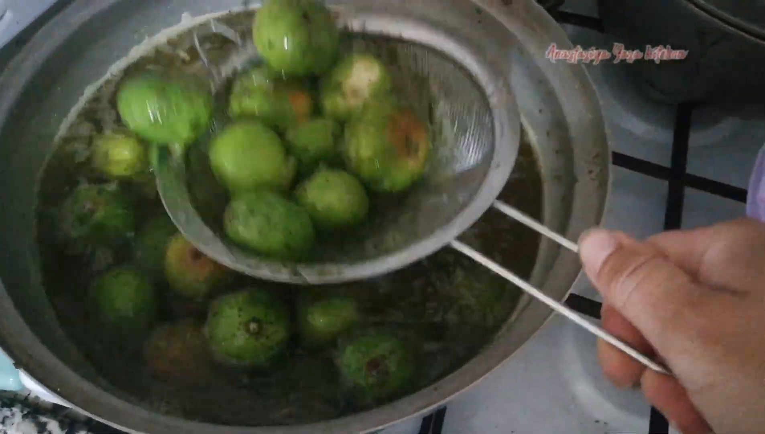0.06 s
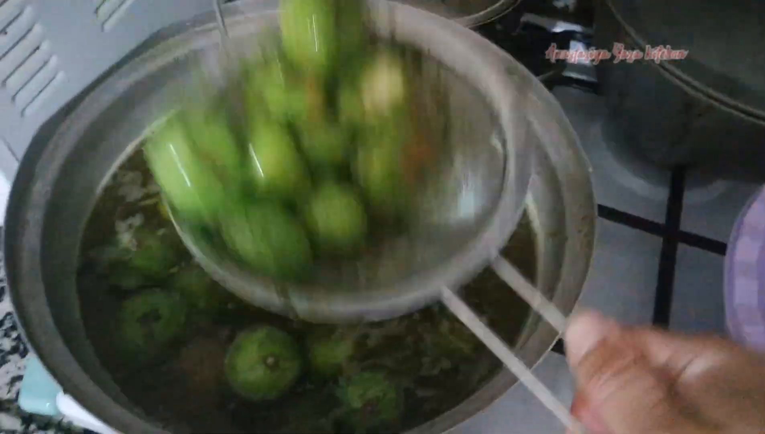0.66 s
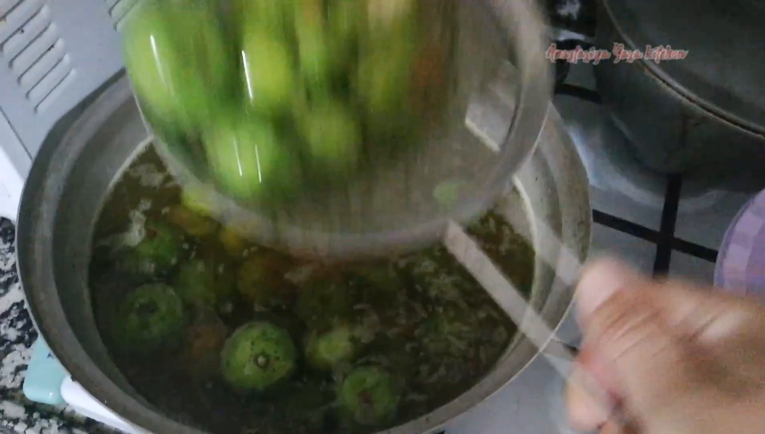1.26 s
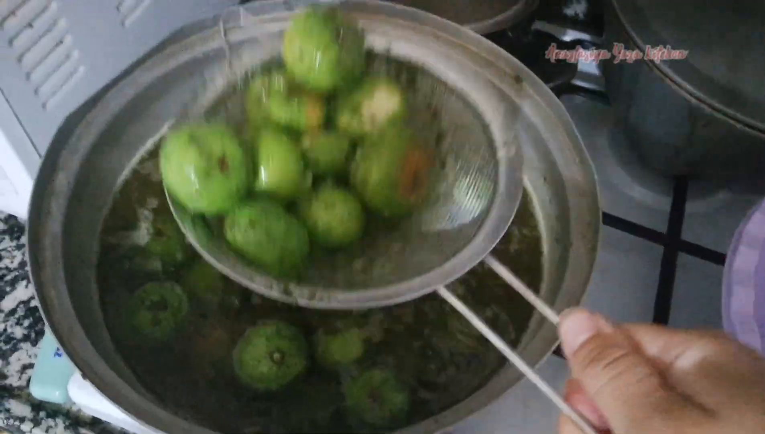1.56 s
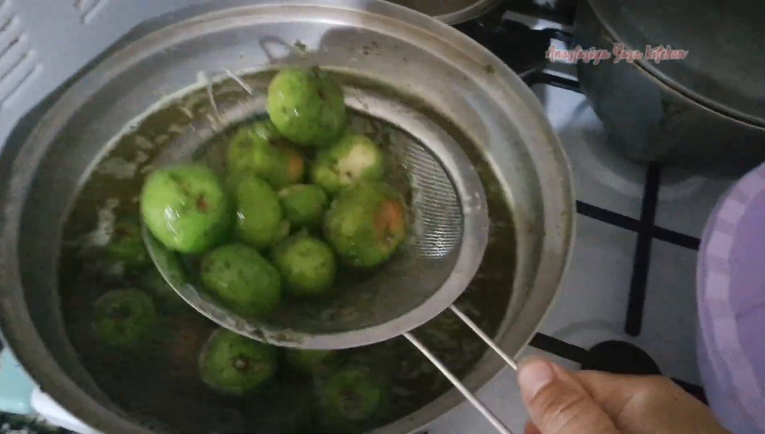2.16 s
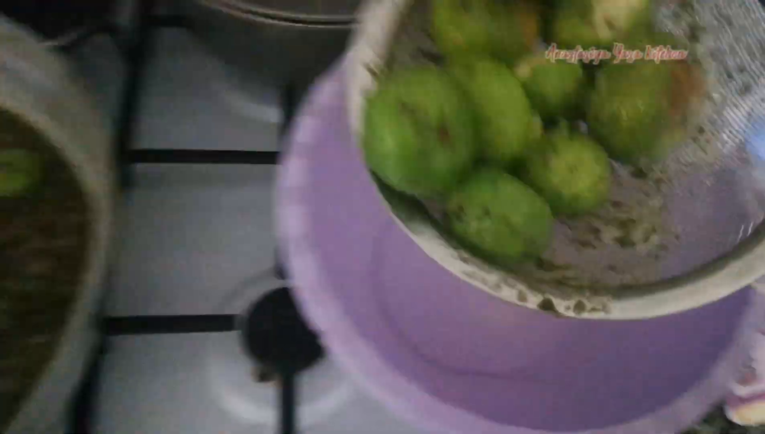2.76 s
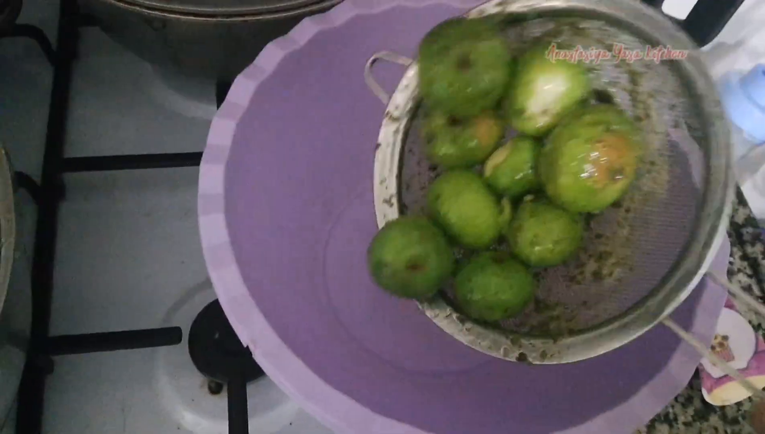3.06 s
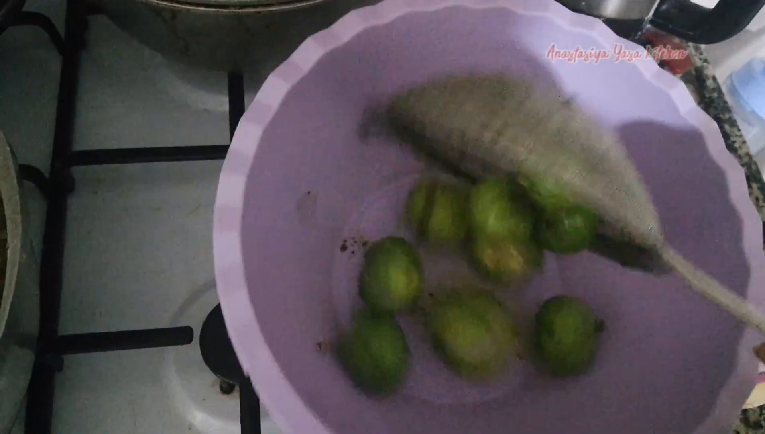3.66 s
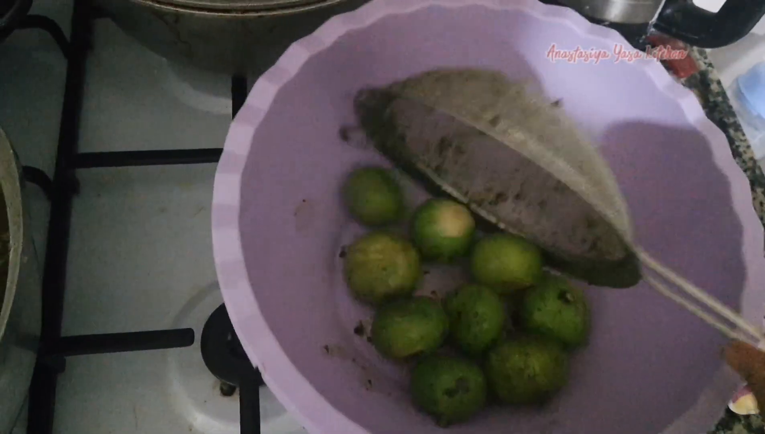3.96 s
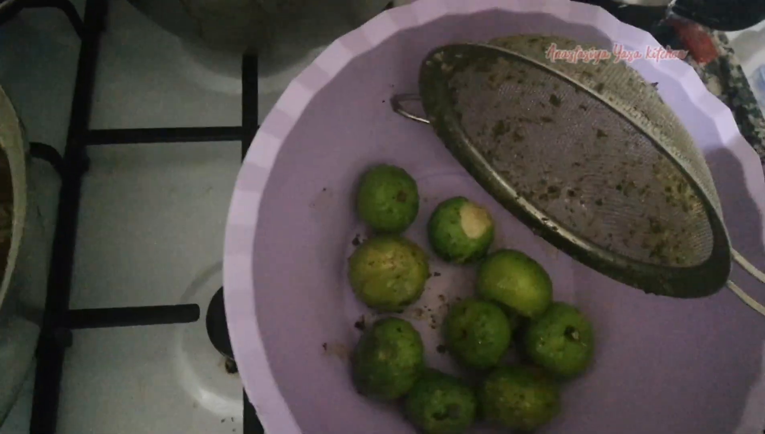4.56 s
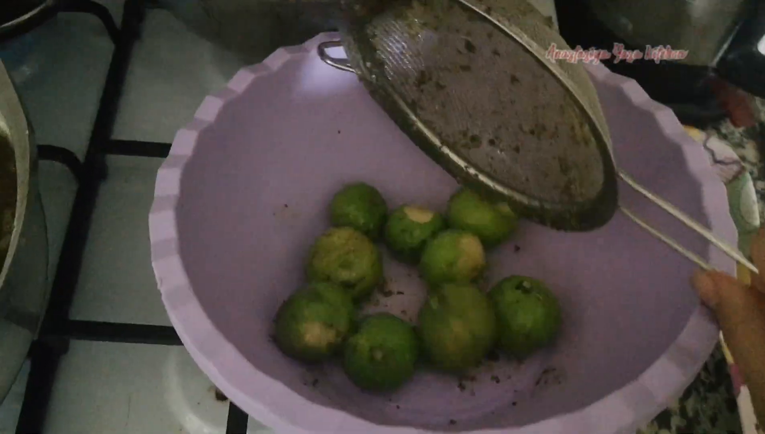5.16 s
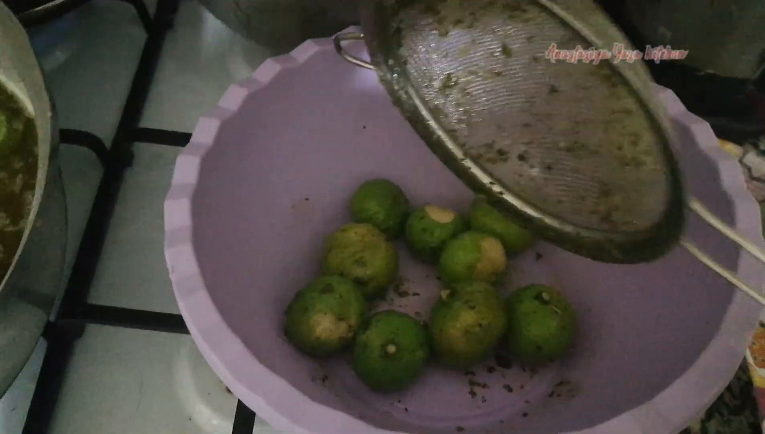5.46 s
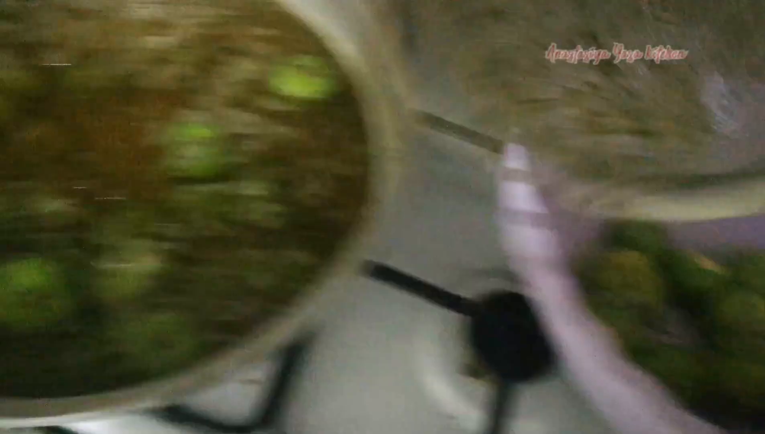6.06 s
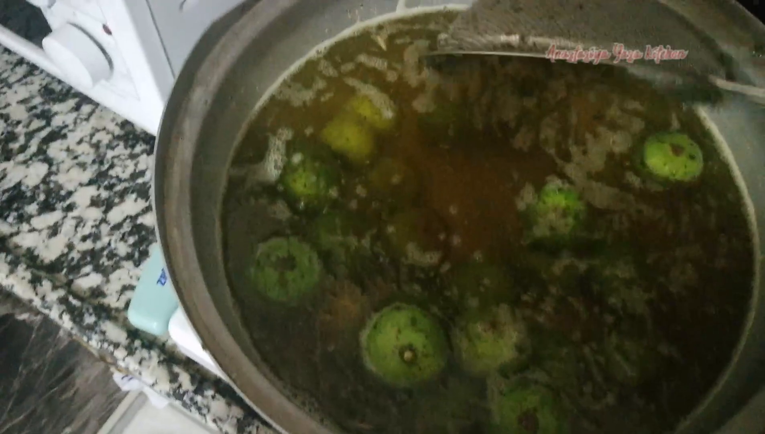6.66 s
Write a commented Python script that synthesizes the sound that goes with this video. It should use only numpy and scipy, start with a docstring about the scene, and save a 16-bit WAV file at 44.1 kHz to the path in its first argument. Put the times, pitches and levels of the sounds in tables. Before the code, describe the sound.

A gas flame hisses softly in a small kitchen while drops plink from a wire skimmer into a pot. Wet figs then tumble into a plastic bowl with hollow thumps, slaps and rolling, and the bowl chatters on the hob grate. After a lull it gives a sharp knock. Finally the skimmer clinks on the pot and plunges in, rasping and sloshing. Everything sounds close.

```python
"""A gas flame hisses in a small kitchen while boiled figs drip from a wire skimmer back into the pot.
Near 3 s they tumble into a plastic bowl on the hob: each thumps the thin floor, slaps wetly and rolls,
droplets spatter, and the bowl rocks and chatters on the iron grate. At 4.7 s it drops back with a
sharp knock. From 6.4 s the skimmer clinks on the pot and plunges in again, rasping and sloshing."""
import sys
import numpy as np
from scipy import signal
from scipy.fft import rfft, irfft, next_fast_len
from scipy.io import wavfile

SR = 44100
rng = np.random.default_rng(int(sys.argv[2]) if len(sys.argv) > 2 else 0)


def materialize(psi):
    """Save the field psi as 16-bit PCM at rate SR to the path in sys.argv[1].

    A 1-D psi becomes a single channel; in a 2-D psi each row is a channel.
    """
    bounded = np.clip(np.atleast_2d(psi).T, -1, 1)
    quanta = np.round(bounded * 32767).astype(np.int16)
    wavfile.write(sys.argv[1], SR, quanta)


N = 299791
TIME = np.arange(N) / SR
AGE = np.arange(SR // 2) / SR   # seconds since a hit

# stereo image of the noises, mono in the bass and wide on top: f/Hz, left-right correlation
STEREO_LIKENESS = [(60, 1), (150, 0.97), (290, 0.86), (640, 0), (1400, 0.37), (3000, 0.023), (15000, 0)]
# low room tone: f/Hz, density/dB
ROOM_SPECTRUM = [(20, 0), (35, -6), (48, 6.5), (70, -7), (100, -13), (120, -12.5), (145, -2.5),
                 (185, -10.5), (235, -6.5), (330, -15.5), (500, -21.5)]
# mains hum: f/Hz, level/dB
HUM_PARTIALS = [(49.5, -65), (100, -67.5), (300, -71)]
# kitchen reverb: band centre f/Hz, level/dB, t60/s
KITCHEN_BANDS = [(120, 4.5, 0.32), (254, 3.5, 0.099), (520, -2, 0.29), (950, -6, 0.5), (2120, -1.5, 0.15),
                 (4500, -3, 0.27), (7900, -3.5, 0.073)]
# level of the gas flame as the listener moves: t/s, level/dB
FLAME_LEVEL = [(0, -56.5), (1.6, -57), (2.4, -58.5), (4.4, -57), (5.8, -56), (6.8, -53.5)]
# hiss of the flame: f/Hz, density/dB
HISS_SPECTRUM = [(200, -13), (350, 2.5), (520, 0), (800, 1.5), (1300, 4.5), (2300, 1), (3500, 0.5),
                 (5000, -1), (7500, 2.5), (10000, -2.5), (12000, -8), (15500, -13)]
# hollow around the pot, rung by the flame: f/Hz, width/Hz, level/dB
POT_CAVITY = [(1030, 53, 0.5), (1447, 100, 1.5), (1520, 55, -14), (2876, 59, -4.5), (4330, 250, -11)]
# hollow around the bowl, rung by the flame: f/Hz, width/Hz, level/dB
BOWL_CAVITY = [(622, 27, -7.5), (1176, 46, 1.5), (1330, 46, 3.5), (1530, 84, -3.5), (2780, 150, -11)]

# drops falling into the pot: t/s, tick/dB, bubble/dB, bubble f/Hz, bubble t60/cycles
DROPS = [(.038, -55, -37.5, 6300, 66), (.189, -56.5, -53, 8100, 60), (.38, -56, -49, 9700, 20),
         (.424, -46, -34.5, 1696, 70), (.551, -55.5, -48.5, 4190, 360), (0.558, -55, -44, 1630, 30),
         (.582, -58, -50, 2590, 70), (.628, -70, -53, 3600, 180), (.691, -62, -36, 9000, 70),
         (.723, -54, -51, 2100, 61), (.725, -63, -49.5, 1110, 45), (.767, -55, -38, 12200, 50),
         (0.829, -52, -56, 2420, 54), (0.8832, -51, -29.5, 9780, 136), (1.237, -58, -49.5, 2800, 120),
         (2.783, -55, -59, 1630, 20), (2.981, -54, -55, 12200, 60), (6.121, -54, -42, 9360, 90)]
# showers of fine droplets from the mesh: t/s, attack/s, hold/s, t60/s, level/dB
SHOWERS = [(3.389, .004, .004, 0.088, -45), (3.43, 0.0027, 0.0091, 0.2, -37),
           (3.475, 0.16, .008, 0.66, -55), (6.52, 0.068, 0.019, .05, -38.5), (6.626, 0.063, 0.044, .2, -49)]
# sizzle of those droplets: f/Hz, density/dB
SPATTER_SPECTRUM = [(3500, -9), (6500, 4.5), (9000, 6), (12000, -5), (15500, -5)]

# the skimmer jerking down the pot wall: t/s, attack/s, scrape/dB, slosh/dB
PLUNGE_STROKES = [(6.36, 0.024, -45, -48), (6.398, 0.017, -38.5, -67), (6.45, 0.057, -33.5, -50.5),
                  (6.56, 0.031, -36, -42.5), (6.61, 0.047, -43.5, -47), (6.689, 0.058, -36, -51.5)]
# wire scraping the pot: f/Hz, density/dB
SCRAPE_SPECTRUM = [(240, -41), (400, -10), (473, -7.5), (543, -17), (605, -6.5), (761, -4), (1100, -1),
                   (1400, -2), (1950, -7), (2840, -2), (4030, -8), (4840, -7), (5910, -6.5), (8030, -12),
                   (15500, -30)]
# water shoved aside: f/Hz, density/dB
SLOSH_SPECTRUM = [(70, -29), (120, -7.5), (165, 1.5), (240, -1.5), (320, -8.5), (500, -14.5), (900, -39)]
# the skimmer striking the pot: t/s, ring/dB, crack/dB
RIM_HITS = [(6.3613, -29.5, -33.5), (6.3777, -45, -44), (6.612, -33, -24.5), (6.619, -46, -31),
            (6.779, -44, -38.5)]
# ring of the skimmer's rim: f/Hz, level/dB, t60/s
RIM_MODES = [(880, -10, 0.2), (1380, -23, 0.031), (1572, -2.5, 0.1), (2293, 3.5, 0.063), (2350, -4, 0.18),
             (2870, -8, 0.13), (3380, -3, 0.086), (6130, 1, 0.024), (7600, 14, 0.014), (8270, 11, 0.011),
             (9130, -3, 0.066)]

# figs rolling over the bowl floor: t/s, attack/s, hold/s, t60/s, rumble/dB, wet rub/dB
FIG_ROLLS = [(3.06, 0.046, 0.012, 0.45, -32.5, -34.5), (3.419, 0.019, 0.017, 0.36, -31.5, -34.5),
             (3.5, 0.19, 0.038, 0.42, -40.5, -44), (3.98, 0.083, .01, 0.48, -73, -55.5),
             (4.13, .16, .03, .2, -58.5, -48.5), (4.62, 0.036, 0.012, 0.17, -54.5, -46),
             (4.71, 0.034, 0.16, 0.23, -41, -40)]
# low drumming of rolling fruit: f/Hz, density/dB
RUMBLE_SPECTRUM = [(35, -43.5), (60, -37), (86, 1), (128, -2.5), (161, 4), (206, -0.5), (302, 1),
                   (398, -9.5), (466, -7), (900, -15), (1170, -50), (1980, -120)]
# wet skin rubbing on plastic: f/Hz, density/dB
RUB_SPECTRUM = [(470, -37), (800, -15), (1240, -28), (1340, -1.5), (2300, -3.5), (2500, -6.5), (3710, -14),
                (10000, -20), (15000, -54)]
# the bowl singing under rolling fruit: f/Hz, width/Hz, level/dB
ROLL_RESONANCES = [(318, 50, -0.5), (473, 27, 4.5), (1090, 260, -4), (1880, 43, -5), (2480, 130, -9)]

# ring of the bowl's walls: f/Hz, level/dB, t60/s
WALL_MODES = [(247, 3.5, 0.12), (291, -1.5, 0.13), (361, -4.5, 0.065), (473, -1, 0.17), (607.4, 6, 0.12),
              (657, 7, 0.041), (764, 0, 0.051), (855, -7.5, 0.13), (1058, 3.5, 0.083), (1188, 4, 0.095),
              (1540, 2.5, 0.079)]
# dull pat of a fig's flesh: f/Hz, density/dB
PAT_SPECTRUM = [(280, -6), (600, 13), (1300, -1.5), (2200, -13)]
# wet skin smacking plastic: f/Hz, density/dB
SLAP_SPECTRUM = [(600, -56), (1500, 1.5), (2200, 6), (3200, 2), (4200, 0.5), (6000, -6.5), (9500, -9.5),
                 (12000, -19), (16000, -41)]
# tight, damped clack of the bowl's foot on the grate: f/Hz, level/dB, t60/s
FOOT_MODES = [(1178, -5, 0.022), (1587, 3.5, 0.007), (1907, -4.5, 0.015), (2180, -30, 0.019),
              (3950, -21, 0.023)]
# the foot chattering: t/s, first clack/dB, first wall ring/dB, gap between touches/s, loss per touch/dB
FOOT_KNOCKS = [(3.0704, -16.5, -30.5, 0.021, 14), (3.125, -28.5, -38, 0.024, 4.5),
               (3.4369, -27, -40, 0.012, 5), (3.6015, -41, -47, 0.012, 0), (4.6836, -35.5, -44, .012, 21),
               (4.712, -16.5, -42, 0.014, 12)]
# figs landing in the bowl: t/s, thump f/Hz, thump/dB, wall ring/dB, wet slap/dB
FIG_LANDINGS = [(2.932, 302, -65, -53, -57.5), (3.004, 170, -27.5, -38, -43),
                (3.0215, 157, -24.5, -40, -61), (3.062, 150, -24.5, -37.5, -35.5),
                (3.092, 171, -25, -28.5, -34), (3.125, 154, -29, -28.5, -32.5),
                (3.3409, 162.5, -28.5, -49.5, -32.5), (3.374, 151, -35, -55, -50),
                (3.397, 140, -55, -50, -44), (3.428, 213, -26.5, -44, -60), (3.434, 221, -21.5, -31, -43),
                (3.4365, 218, -25, -26.5, -21.5), (3.4494, 222, -22.5, -28.5, -36),
                (3.543, 138, -32, -47, -31.5), (3.6019, 157, -28.5, -33.5, -50),
                (3.616, 141, -30.5, -35.5, -40.5), (3.627, 149, -26.5, -59, -40),
                (3.703, 150, -37.5, -52, -50), (3.7204, 290, -27.5, -40.5, -54.5),
                (3.735, 261, -33.5, -39.5, -47), (3.79, 266, -40, -55, -62), (3.806, 262, -40.5, -57, -52),
                (4.6829, 294, -47, -35.5, -34), (4.7135, 187, -26.5, -45, -53),
                (4.7245, 180, -28.5, -32.5, -33.5)]


def from_db(db):
    """Decibels to gain."""
    return 10 ** (np.asarray(db) / 20)


def rms_one(x):
    """Scale to unit rms."""
    return x / np.sqrt(np.mean(x ** 2) + 1e-20)


def unit_hit(x):
    """Scale a hit to unit rms over its first 10 ms."""
    return x / np.sqrt(np.mean(x[..., :SR // 100] ** 2) + 1e-20)


def pan(db):
    """Stereo gains with the left louder than the right by 'db'."""
    return from_db(np.array([[db], [-db]]) / 2)


def add(out, start_s, sound):
    """Drop a sound onto the timeline."""
    at = round(start_s * SR)
    out[:, at:at + sound.shape[-1]] += sound[..., :N - at]


def decay(t60):
    """The envelope of a hit, down 60 dB after t60 seconds."""
    return from_db(-60 * AGE / t60)


def swell(start_s, attack_s, hold_s, t60):
    """An envelope that ramps up, holds and dies away."""
    age = TIME - start_s
    release = from_db(-60 * np.maximum(age - attack_s - hold_s, 0) / t60)
    return np.clip(age / attack_s, 0, 1) * release


def colour(white, spectrum):
    """EQ two unrelated noises and pull their bass to the centre; rms 1."""
    length = white.shape[-1]
    size = next_fast_len(length)
    log_hz = np.log(np.arange(size // 2 + 1) * SR / size + 1e-9)
    hz, db = np.transpose(spectrum)
    past_edge = np.abs(log_hz - np.clip(log_hz, np.log(hz[0]), np.log(hz[-1])))
    gain = from_db(np.interp(log_hz, np.log(hz), db) - 50 * past_edge)
    like_hz, likeness = np.transpose(STEREO_LIKENESS)
    alike = np.clip(np.interp(log_hz, np.log(like_hz), likeness), -1, 1)
    mid, side = rfft(white, size) * gain
    stereo = np.sqrt(1 + alike) * mid + np.sqrt(1 - alike) * side * [[1], [-1]]
    return rms_one(irfft(stereo, size)[:, :length])


def noise(spectrum, size=N):
    """Smooth stereo noise of a given spectrum."""
    return colour(rng.standard_normal((2, size)), spectrum)


def grains(per_s, spread_db):
    """Two streams of random clicks of uneven size."""
    sizes = from_db(spread_db * np.minimum(rng.exponential(1, (2, N)), 4))
    signs = rng.choice([-1, 1], (2, N))
    fires = rng.random((2, N)) < per_s / SR
    return rms_one(sizes * signs * fires)


def drift(rate_hz):
    """A slow random wander on the order of 1."""
    knots = rng.standard_normal(1000)
    return np.interp(TIME * rate_hz, np.arange(len(knots)), knots)


def flutter(x, depth_db, rate_hz, bands):
    """Split a sound into bands that each swell and sink on their own; rms 1."""
    size = next_fast_len(N)
    spectrum = rfft(x, size)
    log_hz = np.log(np.arange(size // 2 + 1) * SR / size + 1)
    place = np.interp(log_hz, np.log([600, 12000]), [0, bands - 1])
    windows = (np.maximum(1 - np.abs(place - k), 0) for k in range(bands))
    slices = (irfft(spectrum * window, size)[:, :N] for window in windows)
    return rms_one(sum(band * from_db(depth_db * drift(rate_hz)) for band in slices))


def resonate(x, resonances):
    """Play a sound through parallel resonators; rms 1."""
    return rms_one(sum(from_db(db) * signal.lfilter(*signal.iirpeak(hz, hz / width, fs=SR), x)
                       for hz, width, db in resonances))


def ring(hz, t60, rise=0):
    """A dying sine; its pitch bends up by the fraction 'rise' as it dies."""
    bend = 1 + rise * np.minimum(AGE / t60, 1) / 2
    return np.sin(2 * np.pi * hz * AGE * bend) * decay(t60)


def strike(modes, scatter_db, lag_s, detune=0):
    """Ring all modes with a fresh balance and optional detune; the right channel lags a touch."""
    strength, shift = rng.standard_normal((2, len(modes)))
    left = sum((-1) ** k * from_db(db + scatter_db * strength[k]) * ring(hz * (1 + detune * shift[k]), t60)
               for k, (hz, db, t60) in enumerate(modes))
    right = np.interp(AGE - lag_s, AGE, left, left=0)
    return unit_hit(np.array([left, right]))


def burst(spectrum, t60, tail_db, tail_t60):
    """A crack of noise with a softer, longer tail that swells in behind it."""
    crack = decay(t60)
    tail = from_db(tail_db) * decay(tail_t60) * (1 - crack)
    return unit_hit(noise(spectrum, size=len(AGE)) * (crack + tail))


def room_tone():
    """The bed: low room noise and mains hum."""
    hum = sum(from_db(db) * np.sqrt(2) * np.sin(2 * np.pi * (hz * TIME + rng.random()))
              for hz, db in HUM_PARTIALS)
    return from_db(-60) * noise(ROOM_SPECTRUM) + hum


def gas_flame(to_bowl_s=2.19, back_at_pot_s=6.14, swing_s=0.34):
    """The flame flutters and rings the nearer vessel's hollow as the listener swings to the bowl and back."""
    level_db = np.interp(TIME, *np.transpose(FLAME_LEVEL))
    at_bowl = np.clip(np.minimum(TIME - to_bowl_s, back_at_pot_s - TIME) / swing_s, 0, 1)
    roar = rng.standard_normal((2, N))
    hollow = np.sqrt(1 - at_bowl) * resonate(roar, POT_CAVITY)
    hollow += np.sqrt(at_bowl) * resonate(roar, BOWL_CAVITY)
    hiss = from_db(-0.3) * noise(HISS_SPECTRUM) * pan(db=2.5) + from_db(-5) * hollow * pan(db=0.5)
    return from_db(level_db) * flutter(hiss, depth_db=1.75, rate_hz=12, bands=10) * pan(db=1.5)


def kitchen_reverb(send, build_s):
    """Dense reflections off tiles and hob build fast and die away band by band."""
    response = 0
    for hz, db, t60 in KITCHEN_BANDS:
        octave = noise([(hz / np.sqrt(2), 0), (hz * np.sqrt(2), 0)], size=len(AGE))
        tail = octave * decay(t60) * (1 - np.exp(-(AGE / build_s) ** 2))
        unity_gain = np.sqrt(np.sqrt(2) * hz / SR / len(AGE))
        response += from_db(db) * rms_one(tail) * unity_gain
    return signal.fftconvolve(send, response, axes=1)[:, :N]


def drips():
    """A drop ticks on the water, brighter the smaller it is, and traps a bubble that chirps upward."""
    out = np.zeros((2, N))
    for start_s, tick_db, bubble_db, hz, cycles in DROPS:
        tick_spectrum = [(0.6 * hz, -16), (1.05 * hz, 0), (1.5 * hz, -8), (7 * hz, -22)]
        tick = burst(tick_spectrum, t60=0.006, tail_db=-11, tail_t60=0.05) * pan(db=9.5)
        # the bubble is cut off below half its pitch
        low_cut = signal.butter(2, hz / 2, "high", fs=SR, output="sos")
        bubble = signal.sosfilt(low_cut, ring(hz, t60=cycles / hz, rise=0.093)) * pan(db=8)
        add(out, start_s, from_db(tick_db) * tick + from_db(bubble_db) * bubble)
    return out


def spatter():
    """Tiny droplets crackle as they shower into the bowl and as the mesh goes under."""
    envelope = sum(from_db(db) * swell(*timing) for *timing, db in SHOWERS)
    return envelope * colour(grains(per_s=1600, spread_db=2), SPATTER_SPECTRUM) * pan(db=5)


def skimmer_plunge():
    """The mesh rasps down the pot wall in shifting colours, rings the rim and shoves water aside."""
    slips = grains(per_s=6000, spread_db=1)
    rim = strike(RIM_MODES, scatter_db=1, lag_s=0.0001)
    ringing = rms_one(signal.fftconvolve(slips, rim, axes=1)[:, :N])
    # the tone moves with the point of contact
    mesh = flutter(colour(slips, SCRAPE_SPECTRUM), depth_db=4, rate_hz=24, bands=30)
    rasp = (mesh + from_db(-11.5) * ringing) * pan(db=5)
    slosh = colour(grains(per_s=840, spread_db=1.8), SLOSH_SPECTRUM)
    out = np.zeros((2, N))
    for start_s, attack_s, scrape_db, slosh_db in PLUNGE_STROKES:
        envelope = swell(start_s, attack_s, hold_s=0.01, t60=0.41)
        out += envelope * (from_db(scrape_db) * rasp + from_db(slosh_db) * slosh)
    return out


def skimmer_clinks():
    """The wire rim cracks against the pot and rings briefly, damped by hand and water."""
    out = np.zeros((2, N))
    for start_s, ring_db, crack_db in RIM_HITS:
        crack = burst(SCRAPE_SPECTRUM, t60=0.012, tail_db=-15, tail_t60=0.07)
        rim = strike(RIM_MODES, scatter_db=2, lag_s=0.0001)
        add(out, start_s, from_db(crack_db) * crack + from_db(ring_db) * rim)
    return out * pan(db=6.5)


def rolling_figs():
    """Lumpy fruit drums on the bowl floor while its wet skin sticks and peels, making the walls sing."""
    drumming = colour(grains(per_s=900, spread_db=0.5), RUMBLE_SPECTRUM)
    peeling = grains(per_s=2500, spread_db=2.5)
    skin = from_db(-5.5) * colour(peeling, RUB_SPECTRUM)
    singing = from_db(-7) * resonate(peeling, ROLL_RESONANCES)
    rub = (skin + singing) * pan(db=3)
    return sum(swell(*timing) * (from_db(rumble_db) * drumming + from_db(rub_db) * rub)
               for *timing, rumble_db, rub_db in FIG_ROLLS)


def bowl_walls():
    """The thin walls ring, detuned from hit to hit by the shifting load; soft flesh adds a dull pat."""
    modes = strike(WALL_MODES, scatter_db=2, lag_s=0.00015, detune=0.015)
    pat = burst(PAT_SPECTRUM, t60=0.025, tail_db=-30, tail_t60=0.05)
    return (from_db(-1.5) * modes + from_db(-1) * pat) * pan(db=5.5)


def wet_slap():
    """The short, bright smack of something wet meeting plastic."""
    return burst(SLAP_SPECTRUM, t60=0.0091, tail_db=-14.5, tail_t60=0.096) * pan(db=6.5)


def bowl_chatter(touches):
    """The rocking bowl's foot clacks on the grate in even, mostly fading runs and shakes the walls."""
    out = np.zeros((2, N))
    for start_s, clack_db, wall_db, gap_s, loss_db in FOOT_KNOCKS:
        for k in range(touches):
            foot = strike(FOOT_MODES, scatter_db=1, lag_s=0.00007, detune=0.012)
            clack = foot * pan(db=2) + from_db(-9.5) * wet_slap()
            touch = from_db(clack_db) * clack + from_db(wall_db) * bowl_walls()
            add(out, start_s + k * gap_s, from_db(-k * loss_db) * touch)
    return out


def landing_figs():
    """Each fig flexes the bowl floor with a thump, rings the walls and slaps its wet skin down."""
    out = np.zeros((2, N))
    for start_s, hz, thump_db, wall_db, slap_db in FIG_LANDINGS:
        thump = from_db(thump_db) * unit_hit(ring(hz, t60=0.075))
        add(out, start_s, thump + from_db(wall_db) * bowl_walls() + from_db(slap_db) * wet_slap())
    return out


def scene():
    """Hits and drips feed the kitchen reverb; rolls, spatter, plunge, flame and room tone stay dry."""
    low_cut = signal.butter(2, 60, "high", fs=SR, output="sos")   # small objects radiate little deep bass
    hits = signal.sosfilt(low_cut, landing_figs() + bowl_chatter(touches=3) + skimmer_clinks())
    drops = drips()
    reverb = kitchen_reverb(from_db(-8.5) * hits + from_db(-3) * drops, build_s=0.0013)
    textures = rolling_figs() + spatter() + skimmer_plunge()
    return hits + drops + reverb + textures + gas_flame() + room_tone()


def record(dry):
    """Clip peaks at full scale, then cut the top steeply at 15.6 kHz."""
    high_cut = signal.ellip(10, 0.1, 80, 15600, fs=SR, output="sos")
    return signal.sosfilt(high_cut, np.clip(dry, -1, 1))


dry = scene()
out = record(dry)
materialize(out)
```